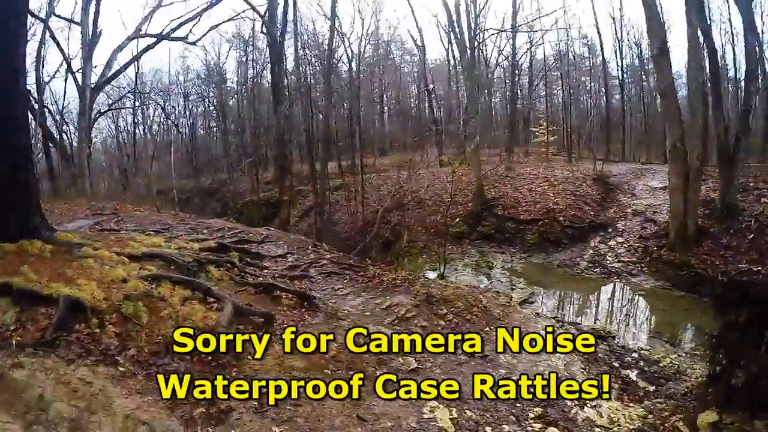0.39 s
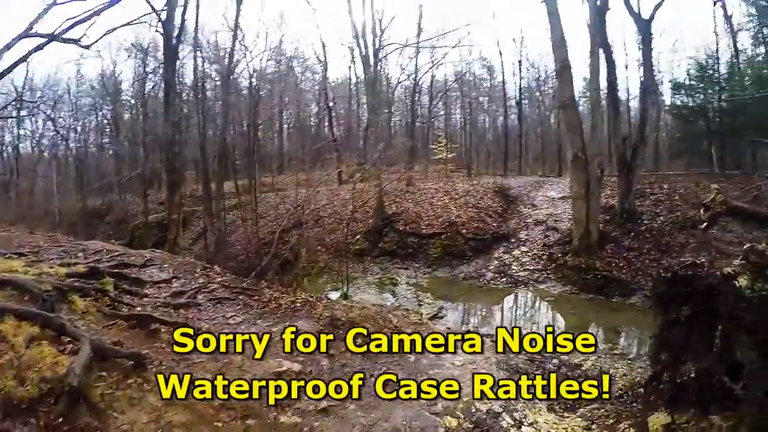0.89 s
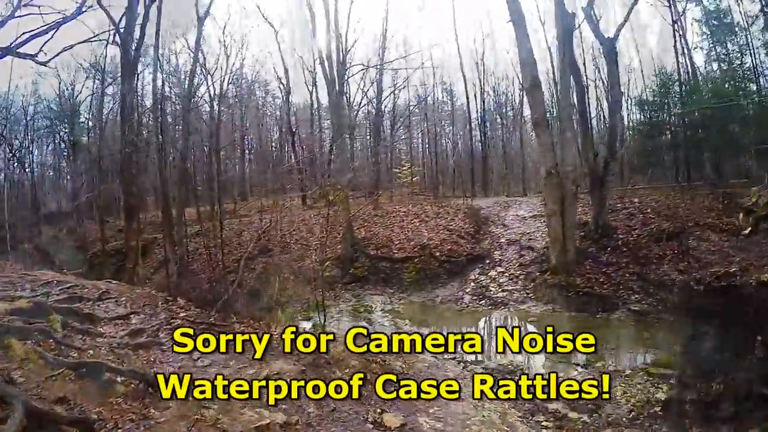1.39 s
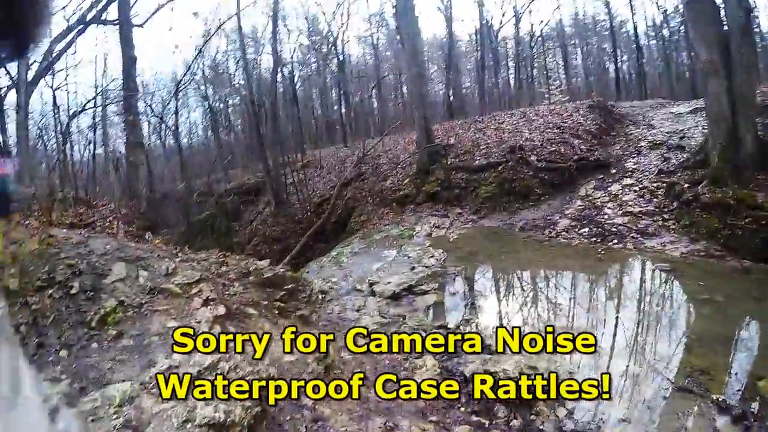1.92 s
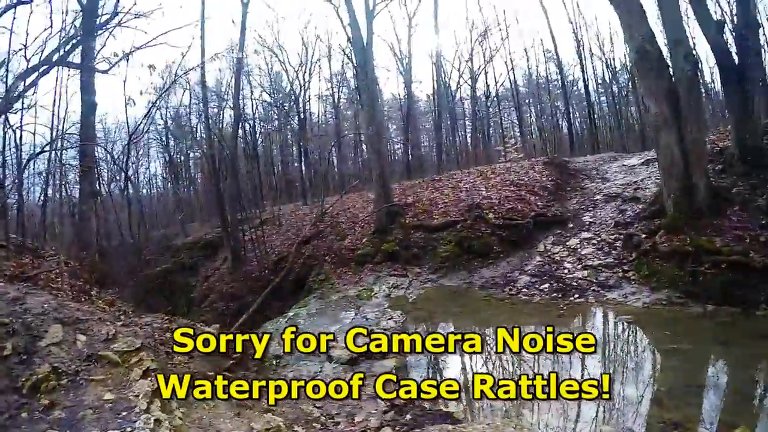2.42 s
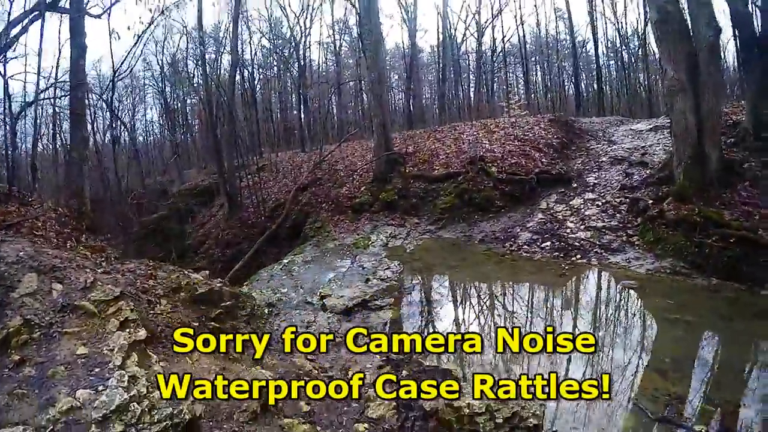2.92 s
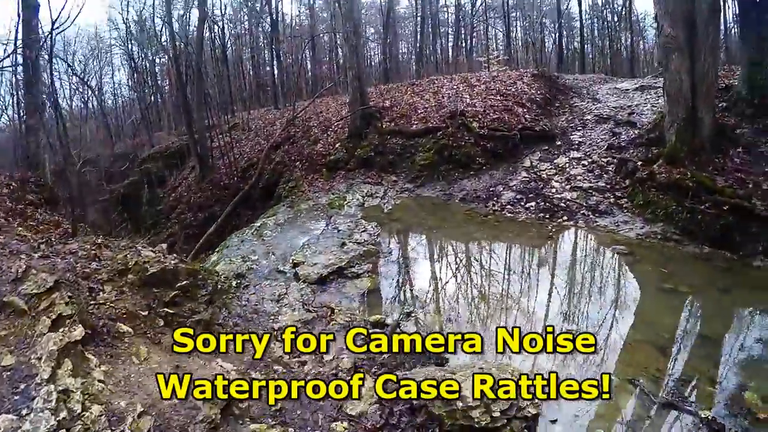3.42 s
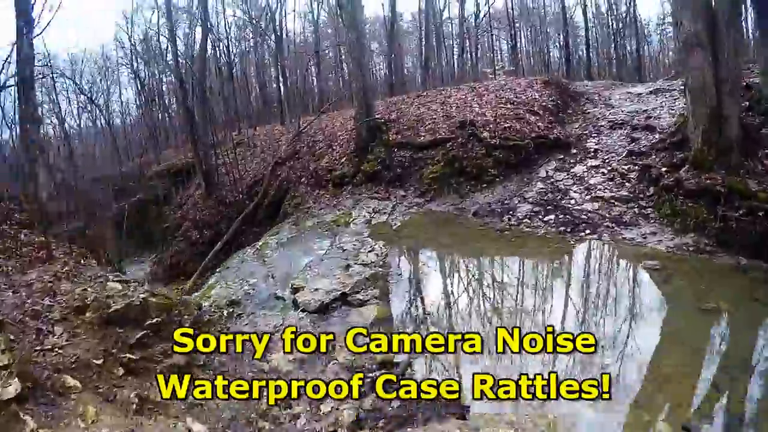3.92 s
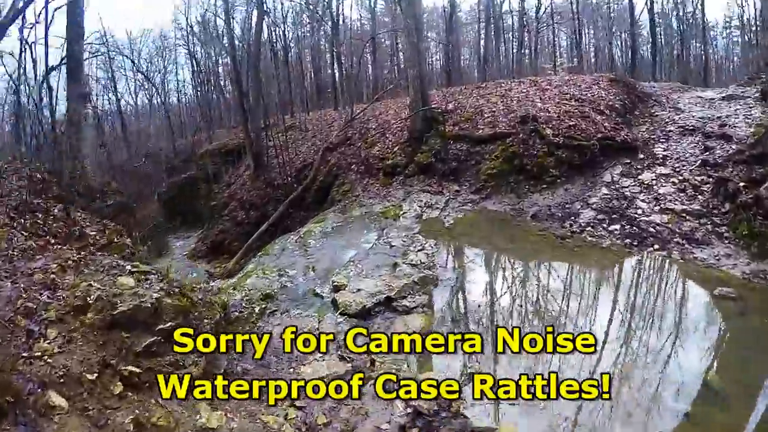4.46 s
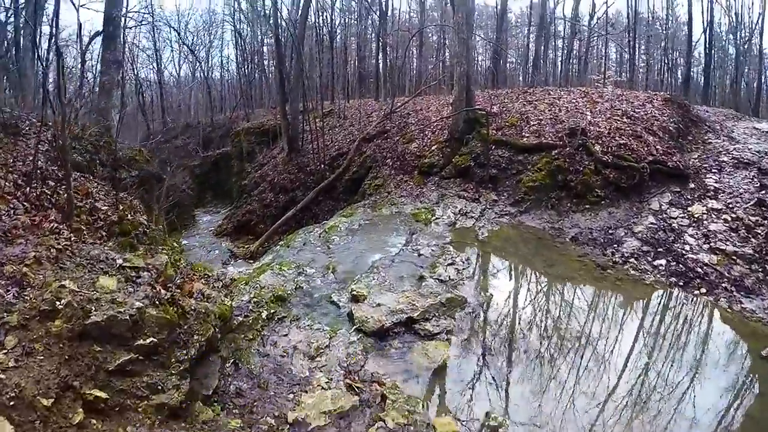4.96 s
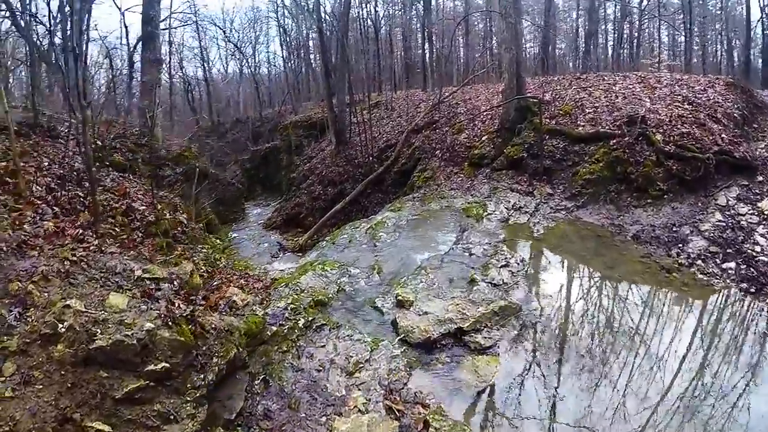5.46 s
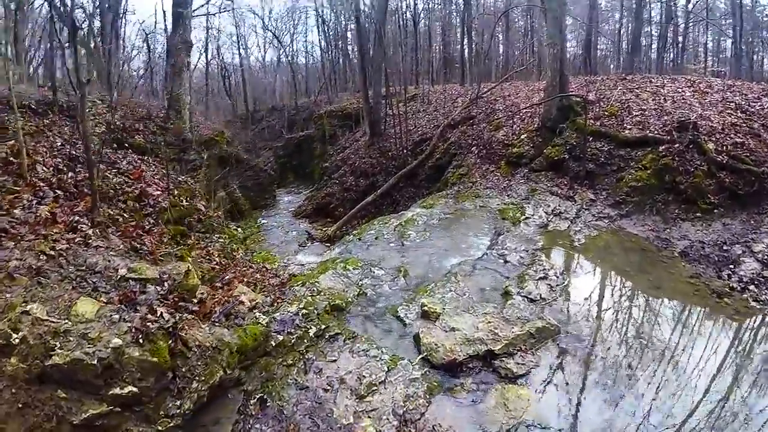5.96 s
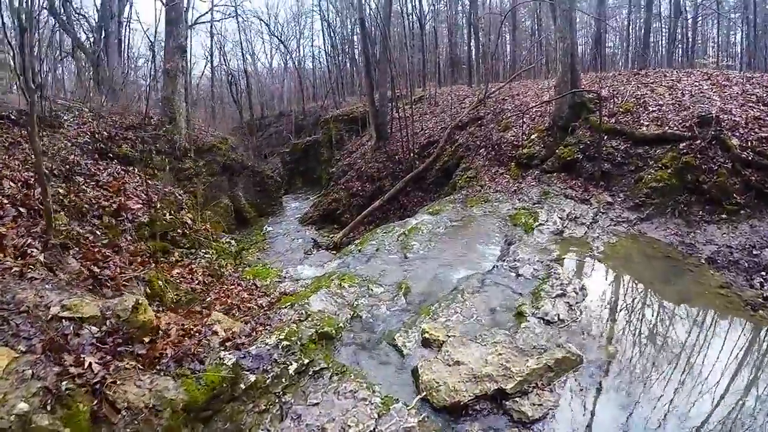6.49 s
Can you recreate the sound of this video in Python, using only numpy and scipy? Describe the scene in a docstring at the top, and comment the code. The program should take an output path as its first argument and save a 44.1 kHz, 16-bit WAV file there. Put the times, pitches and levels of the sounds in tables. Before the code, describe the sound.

Outdoors by a small forest creek, heard from inside a waterproof housing. Hard blows at once, quick fade to near silence, then faint taps and a squashed knock as a second stretch fades in. Bassy jolts and chattering plastic come in irregular clusters, then thin out, leaving soft tremor, slight hiss and smooth running water with tiny splashes.

```python
"""A camera knocks, rubs and rattles inside a sealed plastic housing: noise bursts drive the housing's modes.
Shaking and jolts thump the trapped air and flex the wall: low noise and decaying swings.
A forest creek comes muffled through the wall as coloured noise, one wash in each scene, with faint hiss in the second.
The first scene fades out and the second fades in; the loudest blows overload the microphone."""
import sys
import numpy as np
from scipy import signal
from scipy.fft import rfft, irfft, next_fast_len
from scipy.io import wavfile
from scipy.ndimage import uniform_filter1d, map_coordinates

SR = 44100
rng = np.random.default_rng(int(sys.argv[2]) if len(sys.argv) > 2 else 0)


def int16_out(signal):
    """Quantize to a 16-bit WAV file."""
    q = np.round(np.clip(np.atleast_2d(signal).T, -1, 1) * 32767)
    wavfile.write(sys.argv[1], SR, q.astype(np.int16))


def nominal_scale(level):
    """Amplitude ratio for a level in decibels (scalar or array-like)."""
    x = np.asarray(level, float) / 20
    return 10 ** x


N = 291501  # samples

# Single knocks of camera on housing, not scaled by the fades. Each row: start in seconds, level setting in dB,
# middle-mode and high-mode settings in dB added to it, pitch of the struck wall in Hz. knocks() trims all levels.
KNOCK_ROWS = [(0.008, 13, 3, -9.5, 566), (0.135, 3, -2, -0.5, 473), (0.153, -11, -1.5, -32, 400),
              (0.272, -18, -4, -39, 708), (1.122, -56, -7.5, -17, 507), (1.463, -47, -8, -13, 391),
              (1.587, -39, -5.5, -19, 720), (1.72, -41, -15, -20, 507), (1.8, 0.5, -11, -15.5, 348),
              (1.86, -12.5, -5.5, -24, 667), (2.324, -21, -8.5, -19, 545), (2.348, -10.5, -12, -16, 485),
              (2.491, -52, -15, -16, 570), (2.534, -14, -21, -26.5, 380), (2.637, -19.5, -7, -13, 382),
              (2.692, -29, 1, -6, 334), (2.715, -30.5, -1, -13, 387), (2.821, -40, 6, -14, 507),
              (3.19, -41, -12, -31, 361), (3.234, -30, -22, -20, 437), (3.299, -26, -6, -21, 553),
              (3.756, -19.5, -14, -19.5, 532), (3.847, -27, -1, -12, 540), (3.947, -12.5, -18.5, -41, 320),
              (3.979, -29, -2, -12.5, 365), (4.008, -38, -11, -9, 331), (4.041, -27, -10, -33, 352),
              (4.387, -21.5, -2, -11.5, 353), (4.467, -14.5, -6, -9, 327), (4.492, -33, 12, -2, 540),
              (4.539, -30, -4, -15, 595), (5.234, -32.5, -5.5, -15, 455), (5.89, -37.5, -4, -13, 493),
              (6.152, -34.5, -18, -19, 470), (6.557, -33.5, -16.5, -17, 510)]
# Jolts of the whole housing, not scaled by the fades. Each row: start in seconds, level setting in dB (trimmed in
# jolts()), settled pitch in Hz, t60 in seconds, wall flexing in dB.
JOLT_ROWS = [(0.036, -4, 40, 0.071, -14), (0.106, -12.5, 45.5, 0.11, -42), (0.166, -11, 45.3, 0.09, -18),
             (0.386, -24, 48, .1, -29), (0.471, -16.5, 44, 0.1, -42), (0.557, -21, 48.3, 0.094, -34.5),
             (1.125, -33.5, 52.7, 0.053, -52), (1.482, -22.5, 58.5, 0.037, -40),
             (1.589, -16.5, 64.4, 0.047, -35.5), (1.723, -14.5, 47.2, 0.22, -37),
             (1.81, -13.5, 64, 0.1, -47), (1.901, -25, 45.1, 0.14, -34.5), (2.252, -28, 49.7, 0.078, -20),
             (2.33, -8, 51.6, 0.094, -31), (2.353, 0, 62.2, 0.14, -2.5), (2.454, -12.5, 52.5, 0.31, -38),
             (2.53, -24, 60.6, 0.05, -17), (2.596, -5.5, 52, 0.074, -24), (2.641, 1.5, 53.6, 0.13, -16),
             (2.692, -8, 56.4, 0.3, -14.5), (2.733, -29, 60, 0.054, -29), (2.837, -14.5, 83, 0.29, -18),
             (3.095, -12.5, 61.6, 0.086, -24), (3.193, -9, 89, 0.087, -31), (3.236, -14.5, 69, 0.19, -19),
             (3.303, -7.5, 68.8, 0.053, -23), (3.752, -4.5, 65, 0.042, -20), (3.848, -6.5, 49, 0.15, -26),
             (3.951, 2.5, 73.3, 0.067, -28), (3.979, -9, 67.9, 0.35, -13.5), (4.052, -17, 55, 0.092, -20.5),
             (4.255, -8, 57.5, 0.18, -19), (4.389, -3.5, 56.5, 0.19, -49), (4.426, -4, 43, 0.17, -43),
             (4.469, -2.5, 56.6, 0.095, -22), (4.494, -4, 41.5, 0.18, -25)]
# Camera chattering along the wall, not scaled by the fades. Each row: start in seconds, length in ms,
# low-mode level in dB, middle-mode and high-mode levels in dB relative to it.
RATTLE_ROWS = [(0.186, 30, -35, -1, -25), (0.256, 38.6, -31, -1, -19.5), (0.36, 19, -40.5, -10, -26),
               (0.469, 39.6, -46.5, 8, 0), (0.536, 39.5, -41, -4.5, -15), (0.32, 90, -54, -4, -24),
               (1.426, 28, -56, -1.5, -9.5), (1.55, 26, -44, -7, -17), (1.608, 44, -48, -3.5, -14.5),
               (1.68, 120, -48.5, -3, -11), (2.347, 73, -21, -2.5, -7.5), (2.397, 52, -34, -9, -21),
               (2.44, 41, -58, -17, -16), (2.57, 82, -30.5, -2, -12.5), (2.722, 24, -42, 7.5, -10),
               (2.818, 49, -36.5, 5, -6.5), (3.078, 50, -40.5, -3, -15), (3.291, 25, -31.5, 2.5, -8.5),
               (3.739, 46, -39, 5, -12), (3.842, 19.7, -33, 8.5, -1), (4.051, 86, -36.5, 0.5, -15.5),
               (4.244, 44, -40.5, 2, -23), (4.39, 7.7, -21.5, -8.5, -16), (4.476, 23, -39, -14, -25),
               (4.502, 34, -30, -1, -10.5), (5.019, 71, -50, -17, -25), (6.372, 52, -51.5, -15, -25)]
# Hand on the housing, before the fades. Each row: time in seconds, shaking in dB, rubbing in dB.
HAND_ROWS = [(0, -18, -41), (.15, -19.5, -45.5), (.35, -24, -44.5), (.52, -27.5, -38), (.68, -28, -58),
             (.86, -11.5, -49.5), (1.08, -14, -36.5), (1.25, -6, -26), (1.5, -14.5, -34), (1.7, -10.5, -37),
             (1.9, -14, -59), (2.1, -22, -38.5), (2.6, -12.5, -35.5), (2.85, -19.5, -48.5),
             (3.25, -18.5, -50), (3.52, -27.5, -66.5), (3.96, -20.5, -46.5), (4.2, -23.5, -51.5),
             (4.45, -14, -48.5), (4.72, -26, -58), (5.15, -23.5, -61.5), (5.55, -28.5, -64),
             (6.61, -25, -66)]
# Low modes of the housing. Each row: centre in Hz, width in Hz, relative level in dB.
LOW_MODES = [(379.7, 41, -0.5), (504, 52, 0.5), (571.4, 28, 3), (747.5, 70, -2.5)]
# Middle modes of the housing. Each row: centre in Hz, width in Hz, relative level in dB.
MIDDLE_MODES = [(1027, 230, -4.5), (1324, 170, 1), (1623, 110, 6.5), (2244, 110, 4), (2685, 240, -6)]
# High modes of the housing. Each row: centre in Hz, width in Hz, relative level in dB.
HIGH_MODES = [(3750, 520, 2), (4370, 300, 2.5), (4690, 590, -5), (5440, 140, -4.5), (6200, 1000, -8)]
# Spectrum of the shaken air. Each row: frequency in Hz, relative density in dB per Hz.
SHAKE_SPECTRUM = [(8.8, -38), (15, 1), (44, 2), (68, -10), (150, -33.5), (362, -37.5), (413, -44.5),
                  (500, -41), (650, -72), (1100, -120)]
# Spectrum of the flexing wall. Each row: frequency in Hz, relative density in dB per Hz.
FLEX_SPECTRUM = [(53, -29.5), (90, 3), (129, 2), (167, -11.5), (344, -29.5), (400, -21.5), (520, -47.5),
                 (880, -120)]
# Spectrum of the first scene's creek through the wall. Each row: frequency in Hz, relative density in dB per Hz.
FIRST_CREEK_SPECTRUM = [(530, -48.5), (900, -17), (1120, -17), (1300, -14), (1440, -14), (1670, 4),
                        (1930, -14), (2250, -11), (3090, -27.5), (4250, -14), (5100, -30.5), (9000, -44),
                        (11700, -72.5), (19800, -120)]
# Spectrum of the second scene's creek through the wall. Each row: frequency in Hz, relative density in dB per Hz.
SECOND_CREEK_SPECTRUM = [(290, -45), (500, -28.5), (649, -12), (843, -8), (1080, 1.5), (1440, -3),
                         (1900, -0.5), (2040, -6.5), (2330, 2), (3150, -6.5), (4150, -5), (8700, -20.5),
                         (14500, -30), (15300, -24.5), (16000, -65)]
# Spectrum of the microphone's own hiss. Each row: frequency in Hz, relative density in dB per Hz.
HISS_SPECTRUM = [(1500, -32), (4000, -3.5), (8000, -1), (14500, 0), (15300, -7.5), (16000, -38.5)]

IN_END_S = 3.1  # nominal end of the second scene's rise


def unit(x):
    """Scaled to rms 1."""
    return x / np.sqrt(np.mean(x ** 2) + 1e-20)


def curves(rows):
    """One value per sample for each column after the time."""
    s, *cols = np.transpose(rows)
    return [np.interp(np.arange(N) / SR, s, c) for c in cols]


def wobble(knots_per_s):
    """A smooth random curve, at most 99 knots a second."""
    knots = rng.standard_normal(int(N * 100 / SR) + 4)
    return map_coordinates(knots, [np.arange(N) * min(knots_per_s, 99) / SR])


def filtered(x, response):
    """x times a complex response of frequency."""
    m = next_fast_len(N + SR // 2)
    return irfft(rfft(x, m) * response(np.fft.rfftfreq(m, 1 / SR)), m)[:N]


def rush(spectrum, patchy_db):
    """Coloured noise of rms 1 with time-frequency patches of random gain."""
    f, db = np.transpose(spectrum)
    z = signal.stft(rng.standard_normal(N), nperseg=512)[2]
    field = uniform_filter1d(rng.standard_normal(z.shape), size=6, axis=0)
    field = uniform_filter1d(field, size=10, axis=1)
    noise = signal.istft(z * nominal_scale(patchy_db * unit(field)), nperseg=512)[1][:N]
    return unit(filtered(noise, lambda hz: nominal_scale(np.interp(np.log(hz + 1), np.log(f + 1), db))))


def ring(x, modes):
    """x through resonances of alternating sign, scaled to a mean-square response of 1."""
    def response(f):
        h = 0
        for k, (centre, width, db) in enumerate(modes):
            damping = 1j * f * width
            h = h + (-1) ** k * nominal_scale(db) * damping / (centre * centre - f * f + damping)
        return h / np.sqrt(np.mean(abs(h) ** 2))
    return filtered(x, response)


def fades():
    """Gains of the first scene and of the second."""
    t = np.arange(N) / SR
    first = nominal_scale(-2.2) * np.clip(1 - t / .73, 0, 1) ** 0.76  # steep at the end
    in_start_s, knee = 1.527, 0.071
    u = (t - in_start_s) / (IN_END_S - in_start_s)
    rise = np.minimum((u + np.hypot(u, knee)) / 2, .98)  # straight from a soft knee
    cut_s, cut_rise_s = .78, 0.062  # barely audible entry
    second = rise * np.clip((t - cut_s) / cut_rise_s, 0, 1)
    return first, second


def rubbing():
    """Stick and slip: clumped noise drives three groups of modes at the hand's rubbing level."""
    rub_db = curves(HAND_ROWS)[1]
    scratch = unit(nominal_scale(3.5 * wobble(60)) * rng.standard_normal((3, N)))
    return scratch * nominal_scale([rub_db, rub_db - 3, rub_db - 14.5]) * sum(fades())


def shaking(shake):
    """The shaken housing pumps the trapped air: low noise, evened out as a hand's tremor never rests."""
    air = rush(SHAKE_SPECTRUM, patchy_db=0.4)
    air = unit(air / np.sqrt(abs(uniform_filter1d(air ** 2, size=2600)) + 0.58))
    return shake * nominal_scale(1.5 * wobble(5)) * air


def wall_flexing(shake):
    """Shaking bends the wall steadily and jolts bend it briefly: both set the level of one noise."""
    flex = shake * nominal_scale(-28.5 + 3 * wobble(12))
    rise_s, t60_s = 0.0073, 0.24
    t = np.arange(SR // 2) / SR
    for s, _, _, _, flex_db in JOLT_ROWS:
        flex[round(s * SR):][:len(t)] += nominal_scale(flex_db - 60 * t / t60_s) * (1 - np.exp(-t / rise_s))
    return flex * rush(FLEX_SPECTRUM, patchy_db=2.5)


def first_creek():
    """The creek in the first scene: noise coloured by the housing wall, dying away ever faster."""
    t = np.arange(N) / SR
    level_db = -38 - 20 * t - 10 * np.minimum(t / .5, 2) ** 6
    return nominal_scale(level_db + 1.6 * wobble(30)) * fades()[0] * rush(FIRST_CREEK_SPECTRUM, patchy_db=0.0)


def knocks():
    """Each contact is a decaying noise burst, shorter when harder, its treble over first."""
    drive = np.zeros((3, N))
    t = np.arange(SR // 5) / SR
    for s, db, middle_db, high_db, hz in KNOCK_ROWS:
        contact_ms = max(2.63 - 0.07 * db, .5)
        decay_s = contact_ms / 1000 * np.array([[1.4], [1.0], [.7]])
        push = rng.standard_normal((3, len(t)))
        # the struck wall favours the low modes near its pitch
        push[0] = 0.58 * push[0] + 0.17 * np.sin(2 * np.pi * hz * t)
        chatter = push * np.exp(-t / decay_s) * (1 - np.exp(-t / 0.00097))
        gains = nominal_scale([[db - 0.5], [db + middle_db + 6.0], [db + high_db + 6]])
        at = drive[:, round(s * SR):][:, :len(t)]
        at += (gains * chatter)[:, :at.shape[1]]
    return drive


def jolts():
    """A jolt sets the trapped air swinging, fast at first, with a short thud of the wall."""
    out = np.zeros(N)
    t = np.arange(SR // 2) / SR
    for s, db, hz, t60_s, _ in JOLT_ROWS:
        turns = hz * (t + 0.55 * 0.0076 * (1 - np.exp(-t / 0.0067)))
        swing = nominal_scale(db + 5.5 - 60 * t / max(t60_s, .03)) * np.sin(2 * np.pi * turns)
        swing = swing * (1 - np.exp(-t / 0.0065))
        thud = nominal_scale(db - 14.5 - 60 * t / 0.069) * np.sin(2 * np.pi * 2.31 * turns)
        out[round(s * SR):][:len(t)] += swing + thud
    return out


def rattles():
    """Chatter along the wall: dense noisy taps, a few much harder, shaped into strokes."""
    drive = np.zeros((3, N))
    hard = 1 + 9 * (rng.random(N) < 350 / SR)  # about 350 clacks a second stand out
    tap_db = 2.46 * rng.exponential(size=N) + 0.65 * wobble(95)
    taps = hard * nominal_scale(tap_db) * rng.standard_normal((3, N))
    t = np.arange(SR // 5) / SR
    for s, ms, db, middle_db, high_db in RATTLE_ROWS:
        stroke = np.exp(-(t * 1000 / ms) ** 6) * (1 - np.exp(-t / 0.0036))
        a = round(s * SR)
        burst = taps[:, a:a + len(t)]
        burst = burst / np.sqrt(np.average(burst ** 2, axis=1, weights=stroke ** 2))[:, None]
        drive[:, a:a + len(t)] += nominal_scale([[db], [db + middle_db], [db + high_db]]) * stroke * burst
    return drive


def housing():
    """Rubbing, knocks and rattles ring the housing's modes; the plastic swallows the top."""
    low, middle, high = rubbing() + knocks() + rattles()

    def plastic(hz):
        return 1 / (1 + 1j * hz / 11000) ** 3 / (1 + 1.4j * hz / 7200 - (hz / 7200) ** 2) ** 2

    body = ring(low, LOW_MODES) + ring(middle, MIDDLE_MODES)
    body = filtered(body, lambda hz: 1 / (1 + 1j * hz / 7000) ** 2)
    return body + 1.22 * filtered(ring(high, HIGH_MODES), plastic)


def thumps():
    """Shaking and jolts move the trapped air and the wall."""
    shake = nominal_scale(curves(HAND_ROWS)[0]) * sum(fades())
    return shaking(shake) + jolts() + wall_flexing(shake)


def second_creek():
    """Water over rock ledges in the second scene: a smooth rush, freckled by small splashes."""
    splashes = nominal_scale(0.82 * wobble(95) + 0.64 * wobble(4))
    # grows 1.13 dB a second as the camera turns to the water
    level_db = -47.5 + 1.13 * (np.arange(N) / SR - IN_END_S)
    return nominal_scale(level_db) * fades()[1] * splashes * rush(SECOND_CREEK_SPECTRUM, patchy_db=1.28)


def hiss():
    """The microphone's faint noise, rising with the second scene."""
    return nominal_scale(-63.5) * fades()[1] * rush(HISS_SPECTRUM, patchy_db=3.8)


def scene():
    """Everything reaches one microphone inside the housing."""
    return (housing() + thumps() + first_creek() + second_creek() + hiss())[None]


def roll_off(x):
    """The treble ends steeply here."""
    return signal.sosfilt(signal.butter(12, 16530, fs=SR, output="sos"), x)


def record(dry):
    """Overloads flatten at a ceiling that sinks and rises with the fades; the recorder rolls off the top."""
    ceiling = np.maximum(sum(fades()), nominal_scale(-43))
    flattened = dry[0] / (1 + abs(dry[0] / ceiling) ** 12) ** (1 / 12)
    mix = filtered(flattened, lambda hz: 1 / np.sqrt(1 + (hz / 15400) ** 24))
    return roll_off(mix[None])


dry = scene()
out = record(dry)
int16_out(out)
```